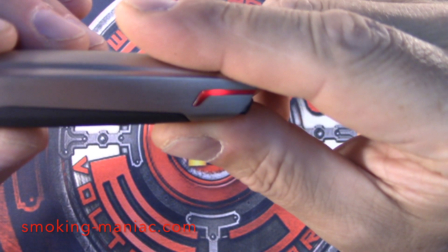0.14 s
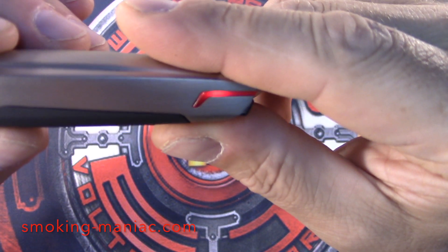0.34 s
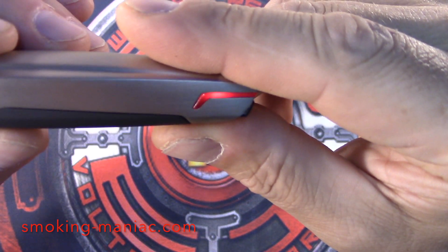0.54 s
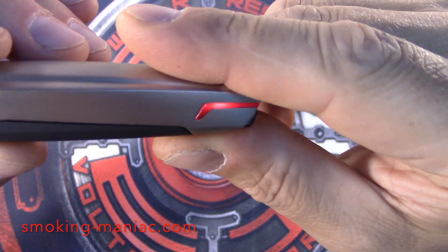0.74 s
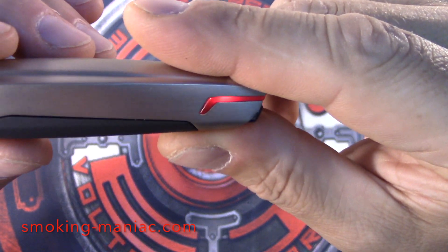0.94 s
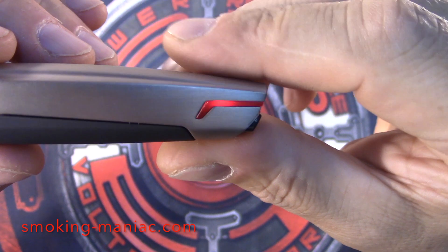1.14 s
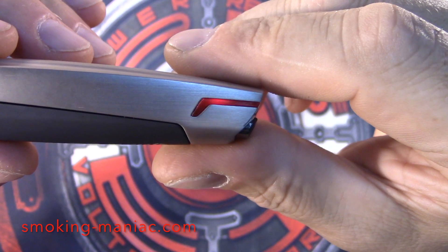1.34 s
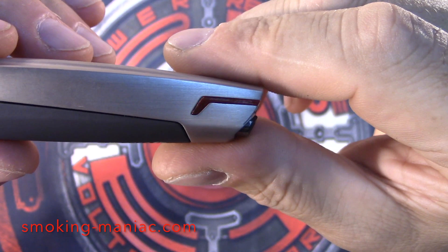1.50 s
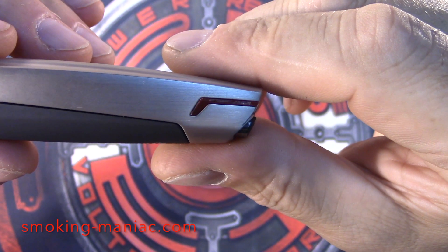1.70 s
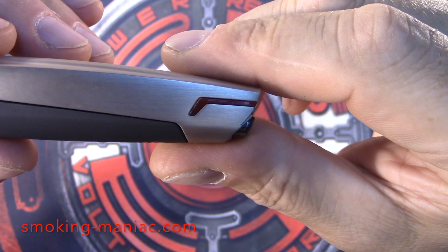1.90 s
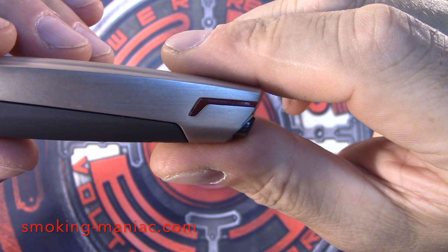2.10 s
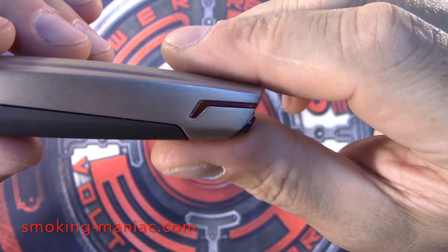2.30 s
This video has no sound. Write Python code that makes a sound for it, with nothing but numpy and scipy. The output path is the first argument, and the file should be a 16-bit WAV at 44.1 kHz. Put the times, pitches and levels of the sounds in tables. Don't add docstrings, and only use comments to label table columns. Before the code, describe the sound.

A small plastic device crackles with a half-second burst of sharp snaps in a quiet room.

```python
import sys
import numpy as np
from scipy import signal
from scipy.fft import rfft, irfft, next_fast_len
from scipy.io import wavfile
from scipy.ndimage import uniform_filter1d

SR = 44100
rng = np.random.default_rng(int(sys.argv[2]) if len(sys.argv) > 2 else 0)


def undo_db(level):
    steps = np.asarray(level, float) / 20
    return 10 ** steps


def to_wav(s):
    ch = np.atleast_2d(s).T
    pcm = np.round(np.clip(ch, -1, 1) * 32767)
    wavfile.write(sys.argv[1], SR, pcm.astype(np.int16))


N = 103635

# (time [s], tube level [dB], overtone over it [dB], shell over it [dB], sharpness [dB])
SNAPS = [(0.2487, -17, -16, -20, -2), (0.2526, -11, -1, -14, 0), (0.265, -25, -14, -12, -5),
         (0.2671, -23, -1, -16, -3), (0.2778, -11, -1, -16, 1), (0.3168, -28, -2, -12, 0),
         (0.3577, -22, -1, -16, 0), (0.3647, -19, -9, -11, -3), (0.3767, -27, 1, -9, 0),
         (0.4076, -28, 0, -16, 0), (0.4094, -26, -2, -14, 0), (0.4265, -14, -5, -14, 0),
         (0.4297, -7, 1, -6, 3), (0.4572, -24, -7, -16, -4), (0.4748, -28, -4, -12, -4),
         (0.4968, -26, -4, -18, 0), (0.5211, -25, -2, -13, 2), (0.5436, -25, -5, -11, -3),
         (0.5712, -25, -5, -12, -4), (0.5727, -12, -4, -20, -3), (0.6024, -17, -3, -8, -3),
         (0.6068, -24, -11, -9, -6), (0.6138, -23, -3, -14, 0), (0.6492, -27, -10, -14, -6),
         (0.6507, -20, -11, -14, -8), (0.6993, -14, 2, -6, -13), (0.7059, -26, -2, -4, -8),
         (0.7166, -29, -12, -2, -12)]
# (time [s], tube level [dB], overtone over it [dB])
CRACKLES = [(0.2012, -30, -3), (0.2465, -37, -9), (0.284, -30, -6), (0.3024, -34, 3), (0.313, -32, -9),
            (0.3487, -34, -5), (0.393, -29, -12), (0.4427, -33, -2), (0.4801, -29, -6), (0.4867, -32, -8),
            (0.493, -32, -5), (0.5018, -36, -3), (0.5094, -29, -3), (0.5165, -31, -6), (0.5276, -29, -4),
            (0.5332, -29, -3), (0.5465, -29, -9), (0.5589, -31, -9), (0.5907, -33, -2), (0.5951, -29, -6),
            (0.6219, -32, -8), (0.6276, -31, -3), (0.6364, -28, -7), (0.6395, -31, -3), (0.6575, -38, 6),
            (0.6667, -35, -2), (0.6722, -32, -2), (0.6748, -27, -5), (0.6842, -29, -5), (0.6901, -30, -6)]
CRACKLE_SHELL_DB, CRACKLE_SHARP_DB = -12, 0.5
# (time [s], peak [dB], frequency [Hz], T60 [s])
FIRST_SPITS = [
    (.171, -54, 7700, .008),
    (.183, -49, 7700, .008),
    (.216, -45, 2500, .008),
    (.216, -47, 7700, .01),
]
# (time [s], level [dB])
SIZZLE = [
    (.17, -74),
    (.24, -93),
    (.256, -45),
    (.34, -47.5),
    (.45, -46),
    (.58, -42.5),
    (.7, -45.5),
    (.725, -51.5),
    (.78, -71),
]
SIZZLE_PER_S, SIZZLE_SPREAD_DB, SIZZLE_STOP_S = 4500, 1.5, 1
# (low [dB], high [dB])
SIZZLE_TUBE_DB = (-4, -3)
SIZZLE_OVERTONE_DB, SIZZLE_SHELL_DB, SIZZLE_EDGE_DB = -1, -12, -4.5

# (frequency [Hz], width [Hz], level [dB])
SHELL_MODES = [(1380, 300, 0)]
TUBE_LOW_MODES = [(2320, 520, 0), (1900, 320, -11)]
TUBE_HIGH_MODES = [(2650, 580, 0), (3100, 420, -11)]
MIDDLE_MODES = [(4620, 230, 0), (5900, 1500, -4)]
OVERTONE_MODES = [(6800, 500, -13), (7250, 300, -13), (7700, 560, 0), (8800, 1000, -17)]
EDGE_MODES = [(8340, 800, 22), (10140, 1150, 21), (12270, 780, 24), (12500, 1100, -23)]
SHELL_DB, TUBE_DB, OVERTONE_DB = 0.5, -5, 1
MIDDLE_DB, EDGE_DB = -17, -15.5
SOFT_HZ = 2300, 3700, 8800, 12500
# (delay [s], level [dB])
LOW_ECHOES = [(.0018, -17), (.003, -11)]
OVERTONE_ECHOES = [(.00235, -11), (.005, -19)]
EDGE_ECHOES = [(.0017, -2), (.0026, -11)]

# (time [s], peak [dB])
KNOCKS = [
    (.7112, -12.5),
    (.7119, -12.5),
]
# (time [s], peak [dB])
THUMPS = [
    (.2526, -27.5),
    (.2778, -37.5),
    (.3647, -35.5),
    (.4297, -19.5),
    (0.5733, -29),
    (0.6007, -32.5),
    (.6993, -21.5),
]
# (time [s], peak [dB])
SPARKS = [
    (.2526, -48),
    (.2778, -46.5),
    (.4297, -35),
]
# (frequency [Hz], width [Hz], level [dB])
CASE_MODES = [(620, 420, 0), (1350, 1250, 10), (2300, 700, 5)]
BELLY_MODES = [(805, 310, 0)]
CASE_SOFT_HZ = 3000

# (first pitch [Hz], last pitch [Hz])
SQUEAK_S = (.224, .247)
SQUEAK_HZ = (7000, 8500)
# (time [s], peak [dB], frequency [Hz], T60 [s])
TICKS = [(0.051, -11.5, 870, 0.0027), (.07, -26, 890, 0.0043), (.194, -29.5, 725, 0.0087),
         (.736, -40, 5400, 0.0067), (0.935, -27.5, 2720, 0.0039), (0.936, -35.5, 4670, 0.0026),
         (1.023, -48, 1190, .006), (1.024, -25, 3430, 0.0012), (1.072, -42.5, 5240, 0.0036),
         (1.233, -42, 4520, 0.0036), (1.3137, -32, 1650, 0.018), (1.3143, -33, 3670, 0.0039),
         (1.3138, -36, 2500, .002), (1.3136, -27, 900, 0.0048), (1.323, -37.5, 3640, 0.0045),
         (1.322, -38, 5150, 0.0031)]
# (time [s], peak [dB], frequency [Hz])
BRUSHES = [
    (0.9354, -35.5, 11000),
    (1.002, -45, 11500),
    (1.024, -40, 10800),
    (1.072, -37.5, 11100),
    (1.233, -43, 12500),
    (1.3225, -36, 8900),
]
BRUSH_T60_S = 0.0011

# (frequency [Hz], T60 [s])
ROOM = [(300, .3), (2500, .24), (8000, .17), (14000, .1)]
ROOM_DB, ROOM_DELAY_S = -24.5, .004
# (time [s], level [dB], softness [Hz])
CLOCK = [
    (0.797, -48, 9000),
    (1.794, -49.5, 9000),
]
# (frequency [Hz], width [Hz], level [dB])
CLOCK_CASE = [
    [(2550, 250, -4), (2770, 200, 0), (4300, 220, -1), (4750, 200, -1), (6220, 200, -5), (7570, 200, -11),
     (8870, 300, -14)],
    [(1670, 250, -3), (2370, 300, -1), (2940, 250, 0), (4410, 400, -4), (5600, 500, -9), (6900, 900, -11),
     (8800, 900, -13)],
]
CLOCK_T60_S, CLOCK_RISE_S = 0.22, 0.008
# (frequency [Hz], density [dB per Hz])
AIR = [(60, -16), (130, -17), (220, -1), (400, -9.5), (1300, -13.5), (7030, -32.5), (15700, -45.5),
       (16100, -64)]
AIR_DB, AIR_PATCHY_DB = -53.5, 1
# (time [s], rise [dB])
HANDLING = [
    (0, 1),
    (.2, 3.5),
    (.9, 1.5),
    (2.35, 0),
]
# (frequency [Hz], width [Hz], rms level [dB])
HUMS = [(613.4, 16, -64), (213, 85, -73)]


def unit(x):
    return x / np.sqrt(np.mean(x ** 2) + 1e-20)


def along(points, hz):
    f, v = np.transpose(points)
    return np.interp(np.log(hz + 1), np.log(f + 1), v)


def curve(rows):
    return np.interp(np.arange(N) / SR, *np.transpose(rows))


def add(track, s, sound):
    part = track[round(s * SR):][:len(sound)]
    part += sound[:len(part)]


def filtered(x, response):
    m = next_fast_len(N + 8192)
    return irfft(rfft(x, m) * response(np.fft.rfftfreq(m, 1 / SR)), m)[:N]


def soft(f, hz):
    return 1 / (1 - (f / hz) ** 2 + 1j * np.sqrt(2) * f / hz) ** 2


def resonant(x, modes, soft_hz=9000, echoes=(), floor_hz=1):
    def response(f):
        rings = 0
        for k, (center, width, db) in enumerate(modes):
            damping = 1j * f * width
            rings = rings + (-1) ** k * undo_db(db) * damping / (center * center - f * f + damping)
        low_cut = (f / floor_hz) ** 4 * soft(f, floor_hz)
        reflections = 1 + sum(undo_db(db) * np.exp(-2j * np.pi * f * s) for s, db in echoes)
        return rings * low_cut * soft(f, soft_hz) * reflections
    impulse = np.arange(N) == 0
    return filtered(x, response) / np.abs(filtered(impulse, response)).max()


def damped_rings(rows):
    out, t = np.zeros(N), np.arange(SR // 20) / SR
    for s, db, hz, t60 in rows:
        envelope = undo_db(db - 60 * t / t60) * (1 - np.exp(-t * hz))
        add(out, s, -envelope * np.sin(2 * np.pi * hz * t))
    return out


def sizzle_grains():
    hits = rng.random(N) < SIZZLE_PER_S / SR
    strength = undo_db(SIZZLE_SPREAD_DB * rng.exponential(size=N)) * rng.standard_normal(N)
    grains = hits * strength
    grains = grains / np.sqrt(np.mean(resonant(grains, TUBE_LOW_MODES) ** 2)) * undo_db(curve(SIZZLE))
    return grains * curve([(.1, 0), (SIZZLE[0][0], 1), (SIZZLE[-1][0], 1), (SIZZLE_STOP_S, 0)])


def crackle():
    rows = list(SNAPS) + [(*row, CRACKLE_SHELL_DB, CRACKLE_SHARP_DB) for row in CRACKLES]
    t = np.arange(SR // 20) / SR
    flutter = undo_db(-29 - 60 * t / 0.028) * (1 - np.exp(-t / 0.00045))
    blows = rng.standard_normal((len(rows), len(t))) * flutter
    blows[:, 0] = 1
    sizzle_db = [*SIZZLE_TUBE_DB, SIZZLE_OVERTONE_DB, SIZZLE_SHELL_DB, SIZZLE_EDGE_DB]
    parts = undo_db(sizzle_db)[:, None] * sizzle_grains()
    for (s, db, overtone_db, shell_db, sharp_db), blow in zip(rows, blows):
        lean_db = .4 * (min(shell_db, -4) + 15)
        part_db = [TUBE_DB + lean_db / 2, TUBE_DB - lean_db,
                   overtone_db + OVERTONE_DB, shell_db + SHELL_DB, sharp_db]
        for part, over_db in zip(parts, part_db):
            add(part, s, undo_db(db + over_db) * blow)
    deep, bright, overtone, shell, sharp = parts
    shell_soft, tube_soft, overtone_soft, edge_soft = SOFT_HZ
    tube = resonant(deep, TUBE_LOW_MODES, tube_soft, LOW_ECHOES)
    tube += resonant(bright, TUBE_HIGH_MODES, tube_soft, LOW_ECHOES)
    low = resonant(shell, SHELL_MODES, shell_soft, LOW_ECHOES) - tube
    middle = undo_db(MIDDLE_DB) * resonant(sharp, MIDDLE_MODES, overtone_soft, OVERTONE_ECHOES)
    edge = undo_db(EDGE_DB) * resonant(sharp, EDGE_MODES, edge_soft, EDGE_ECHOES)
    high = edge - resonant(overtone, OVERTONE_MODES, overtone_soft, OVERTONE_ECHOES, floor_hz=5200)
    mouth = filtered(high, lambda f: soft(f, 13200))
    return low + middle + mouth + damped_rings(FIRST_SPITS)


def knocks():
    blows, thumps, sparks, push = np.zeros((4, N))
    for track, rows in (blows, KNOCKS), (thumps, THUMPS), (sparks, SPARKS):
        for s, db in rows:
            track[round(s * SR)] = -undo_db(db)
    add(push, .4297, undo_db(-47) * np.hanning(round(.004 * SR)))
    case = resonant(blows, CASE_MODES, CASE_SOFT_HZ, LOW_ECHOES[:1], floor_hz=139)
    belly = resonant(thumps, BELLY_MODES, CASE_SOFT_HZ, floor_hz=200)
    spark = resonant(sparks, [(14500, 3500, 0)], 15800, floor_hz=12000)
    return case + belly + spark + push


def squeak():
    t = np.arange(N) / SR
    swell = np.interp(t, [*SQUEAK_S, SQUEAK_S[1] + .002], [0, 1, 0])
    wander = 1 + .45 * unit(uniform_filter1d(rng.standard_normal(N), size=60))
    phase = 2 * np.pi * np.cumsum(np.interp(t, SQUEAK_S, SQUEAK_HZ)) / SR
    return undo_db(-60) * np.sqrt(swell) * wander * np.sin(phase)


def fingers():
    return damped_rings(TICKS + [(*row, BRUSH_T60_S) for row in BRUSHES])


def room(x):
    hz, t, z = signal.stft(rng.standard_normal(SR // 2), SR, nperseg=256)
    decay = undo_db(-60 * t / along(ROOM, hz)[:, None])
    tail = signal.istft(z * decay, SR, nperseg=256)[1]
    delayed = np.pad(x, (round(ROOM_DELAY_S * SR), 0))
    return signal.fftconvolve(delayed, tail / np.linalg.norm(tail))[:N]


def clock():
    out, t = np.zeros(N), np.arange(SR // 3) / SR
    for (s, db, soft_hz), case in zip(CLOCK, CLOCK_CASE):
        ring = unit(resonant(rng.standard_normal(N), case, soft_hz))[:len(t)]
        envelope = undo_db(db - 60 * t / CLOCK_T60_S) * (1 - np.exp(-t / CLOCK_RISE_S))
        add(out, s, envelope * ring)
    return out


def air():
    z = signal.stft(rng.standard_normal(N), nperseg=512)[2]
    field = uniform_filter1d(rng.standard_normal(z.shape), size=6, axis=0)
    field = uniform_filter1d(field, size=12, axis=1)
    noise = signal.istft(z * undo_db(AIR_PATCHY_DB * unit(field)), nperseg=512)[1][:N]

    def spectrum(hz):
        return hz ** 2 / (hz ** 2 + 50 ** 2) * undo_db(along(AIR, hz))
    hiss = undo_db(AIR_DB + curve(HANDLING)) * unit(filtered(noise, spectrum))
    hums = sum(undo_db(db) * unit(resonant(rng.standard_normal(N), [(hz, w, 0)])) for hz, w, db in HUMS)
    return hiss + hums


def scene():
    near = crackle() + knocks() + squeak() + fingers()
    return (near + undo_db(ROOM_DB) * room(near) + clock() + air())[None]


def band_limit(x):
    return signal.sosfilt(signal.butter(12, 16470, fs=SR, output="sos"), x)


def record(dry):
    return band_limit(dry)


dry = scene()
out = record(dry)
to_wav(out)
```